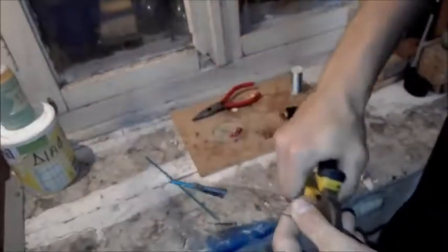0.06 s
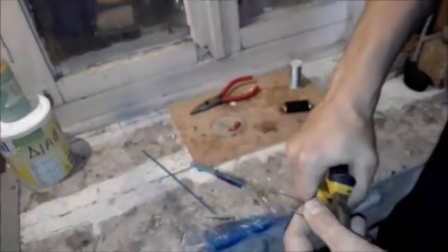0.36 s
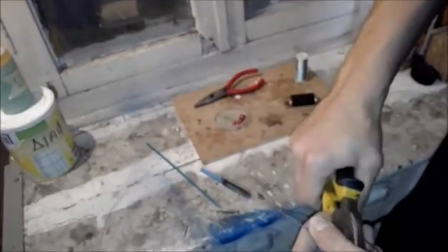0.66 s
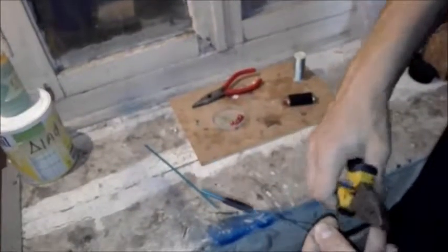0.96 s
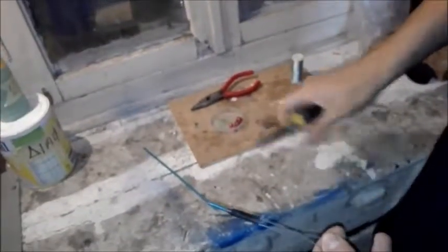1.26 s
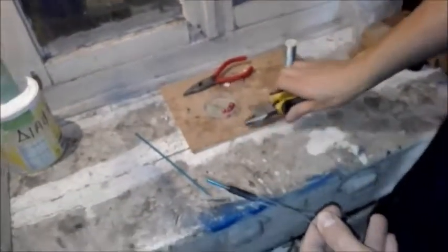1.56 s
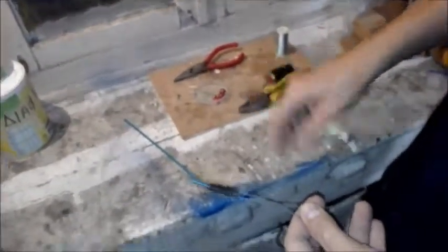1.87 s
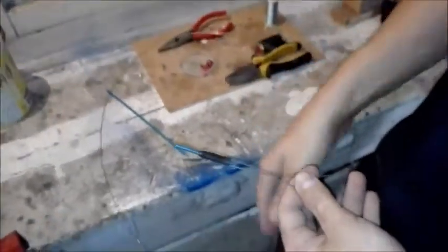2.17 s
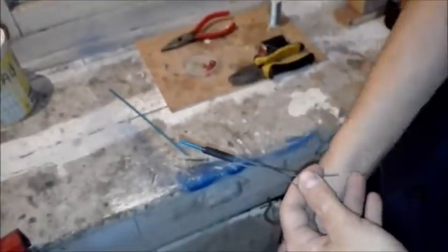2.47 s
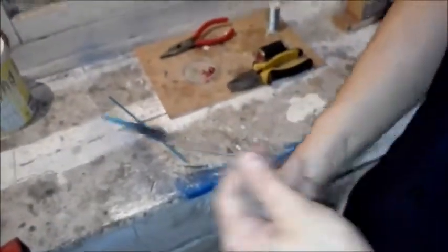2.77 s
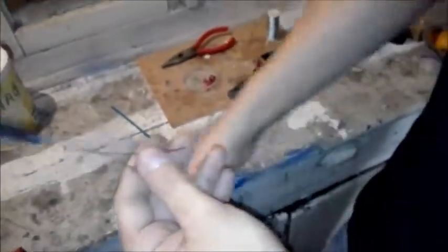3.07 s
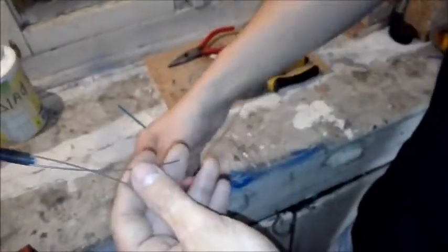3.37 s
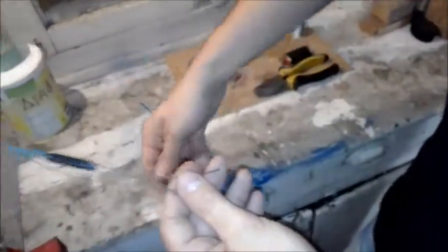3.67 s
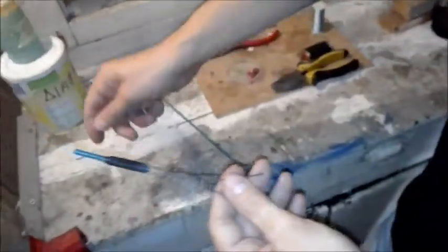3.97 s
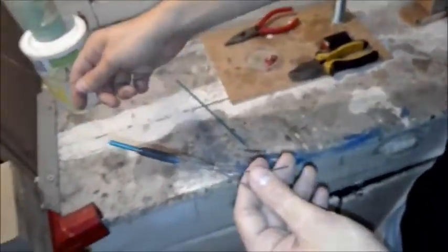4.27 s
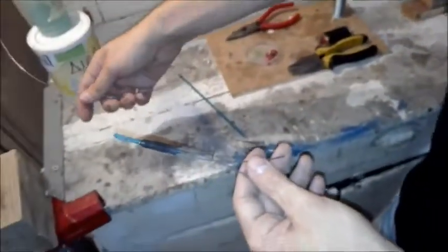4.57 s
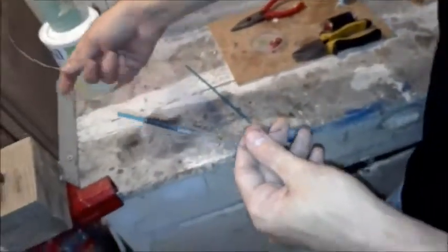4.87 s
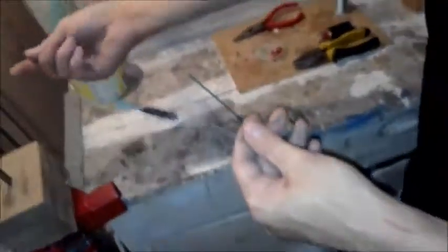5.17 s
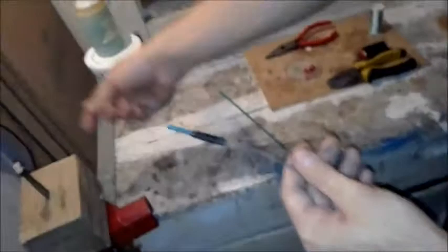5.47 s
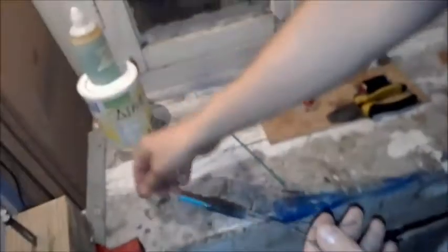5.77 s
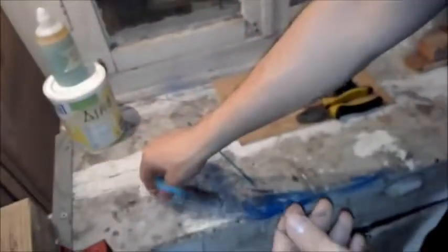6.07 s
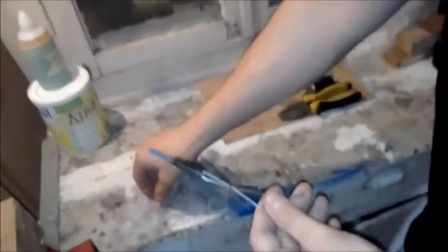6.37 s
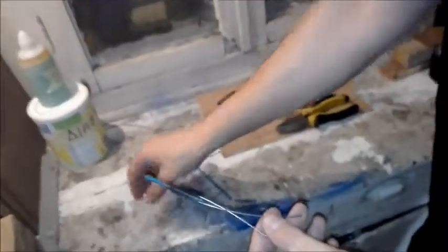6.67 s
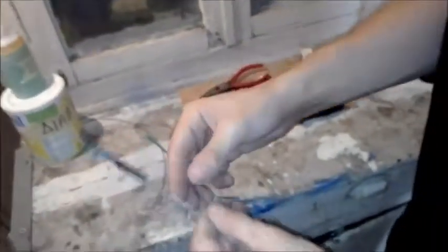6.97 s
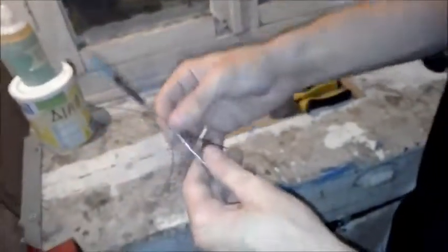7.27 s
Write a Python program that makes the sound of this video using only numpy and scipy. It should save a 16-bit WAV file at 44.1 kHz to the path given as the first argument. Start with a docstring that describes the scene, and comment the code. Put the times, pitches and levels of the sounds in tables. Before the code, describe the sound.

A sharp, ringing wire snip, a dull double thunk of pliers on wood, then light clicks and swishes of handled wire.

```python
"""Side cutters snap through steel wire close to the microphone: the fracture cracks and the tool rings.
The loose jaws clack, and the cutters land on a wooden bench, whose low modes boom in a double thunk.
The springy wire is handled: impacts make it tick, and stick-slip friction makes it scrape and swish.
A small workshop reverberates, over a low rumble, a faint hum and, near the end, a wavering drone."""
import sys
import numpy as np
from scipy import signal
from scipy.fft import rfft, irfft
from scipy.io import wavfile
from scipy.ndimage import map_coordinates

SR = 44100
rng = np.random.default_rng(int(sys.argv[2]) if len(sys.argv) > 2 else 0)


def transcribe(u):
    """Save the signal u as a 16-bit wav file named by the first command-line argument.

    u: samples, shape (n,) or (channels, n), limited to [-1, 1]; the rate is SR.
    q: integer samples, one column per channel.
    """
    v = np.clip(np.atleast_2d(u).T, -1, 1)
    q = np.round(v * 32767).astype(np.int16)
    wavfile.write(sys.argv[1], SR, q)


N = 326511


def undb(db):
    """Amplitude ratio of a level in dB."""
    return 10 ** (np.asarray(db) / 20)


def unit(x):
    """Normalisation to rms 1."""
    return x / np.sqrt(np.mean(x ** 2))


def curve(rows, axis=1):
    """Linear interpolation of one column over the times in the first."""
    rows = np.array(rows)
    return np.interp(np.arange(N) / SR, rows[:, 0], rows[:, axis])


def add(out, s, sound):
    """Superposition of a sound starting at s seconds."""
    i = int(s * SR)
    out[i:i + len(sound)] += sound[:N - i]


def fade(t60):
    """One second of exponential decay, falling 60 dB in t60 seconds."""
    return np.exp(-np.log(1000) * np.arange(SR) / SR / max(t60, 1e-3))


def colour(x, points):
    """Minimum-phase filtering through (Hz, dB) points."""
    size = 8192
    hz, db = np.transpose(points)
    log_hz = np.log(np.fft.rfftfreq(size, 1 / SR) + 1)
    log_gain = np.log(undb(np.interp(log_hz, np.log(hz), db)))
    causal_fold = np.r_[1, np.full(size // 2 - 1, 2), np.zeros(size // 2)]
    cepstrum = irfft(log_gain) * causal_fold
    return signal.oaconvolve(x, irfft(np.exp(rfft(cepstrum))))[:len(x)]


def noise(points):
    """Gaussian noise of rms 1, its spectrum shaped by (Hz, dB) points."""
    return unit(colour(rng.standard_normal(N), points))


def drift(rate_hz):
    """Slow random modulation: noise that falls steeply above rate_hz."""
    return noise([(rate_hz, 0), (4 * rate_hz, -40), (16 * rate_hz, -90)])


def wavering(hz, width_hz):
    """A tone of rms 1, its spectral line broadened by random amplitude and phase modulation."""
    wander = drift(width_hz)
    phase = 2 * np.pi * np.cumsum(hz * np.ones(N)) / SR
    return unit((1 + 1.3 * np.roll(wander, SR)) * np.sin(phase + 0.56 * wander))


def humps(rest_db, rows):
    """An envelope of Gaussian swells added to a steady gain."""
    t = np.arange(N) / SR
    return undb(rest_db) + sum(undb(db) * np.exp(-((t - s) / width) ** 2) for s, width, db in rows)


def ring(modes, scatter=0):
    """Free vibration of damped (Hz, dB, t60) modes, their phases spread over scatter cycles."""
    out = np.zeros(SR)
    for hz, db, t60 in modes:
        t = np.arange(min(int(2 * t60 * SR), SR)) / SR
        envelope = undb(db) * np.exp(-np.log(1000) * t / t60)
        out[:len(t)] += envelope * np.sin(2 * np.pi * (hz * t + scatter * rng.random()))
    return out


def burst(points, t60):
    """A dying rattle of micro-impacts, modelled as damped, filtered noise."""
    white = rng.standard_normal(SR)
    return colour(white * fade(t60), points) / np.std(colour(white, points))


def friction(per_s, spread_db):
    """Stick-slip force: a Poisson train of slips of uneven size."""
    slips = rng.random(N) < per_s / SR
    return unit(slips * rng.standard_normal(N) * undb(spread_db * np.minimum(rng.exponential(size=N), 4)))


def grip(depth_db, rate_hz):
    """Amplitude modulation by a contact that catches and lets go unevenly."""
    jolts = noise([(rate_hz, 0), (4 * rate_hz, -30), (16 * rate_hz, -80)])
    return unit(undb(depth_db * np.clip(jolts, -2, 2)))


def excite(force, modes):
    """Forced vibration of (Hz, dB, t60) modes; dB sets relative power whatever the damping."""
    body = ring([(hz, db - 10 * np.log10(t60), t60) for hz, db, t60 in modes], scatter=0.92)
    return unit(signal.fftconvolve(force, body)[:N])


def waver(x, depth, rate_hz):
    """Random frequency modulation: all pitches wander by the rms fraction depth."""
    place = np.cumsum(1 + depth * drift(rate_hz))
    return map_coordinates(x, [place], order=3, mode="wrap")


def glide(x, rows):
    """Resampling at a changing rate bends all pitches evenly through each stroke."""
    bends = sorted(point for s, length, _, _, start, end in rows
                   for point in ((s, start), (s + length, end)))
    return map_coordinates(x, [np.cumsum(2 ** curve(bends))], order=3, mode="wrap")


def strokes(rows, attack_s, release_s):
    """Envelope of strokes that add in power: each rises, slopes evenly in dB, then decays."""
    power, t = np.zeros(N), np.arange(SR) / SR
    for s, length, db, growth_db, *_ in rows:
        attack = np.clip(t / attack_s, 0, 1)
        hold = undb(db + growth_db * np.clip(t / length, 0, 1))
        release = np.exp(-np.log(1000) * np.maximum(t - length, 0) / release_s)
        add(power, s, (attack * hold * release) ** 2)
    return np.sqrt(power)


def workshop(dry, wet_db, t60s, gap_s):
    """Reverberation: near walls return a diffuse tail, with low, middle and high decay times t60s."""
    tail = np.zeros(SR)
    for edges_hz, t60 in zip(([150, 1200], [1200, 6500], [6500, 16000]), t60s):
        band = signal.butter(3, edges_hz, "band", fs=SR, output="sos")
        tail += signal.sosfilt(band, rng.standard_normal(SR)) * fade(t60)
    tail = np.r_[np.zeros(int(gap_s * SR)), tail / np.linalg.norm(tail)]
    return dry + undb(wet_db) * signal.fftconvolve(dry, tail)[:N]


def ambience():
    """Broadband ambient noise: steady air and hiss, with a low rumble and a dull murk that swell."""
    # Spectrum of the air. Each row: frequency in Hz, relative density in dB.
    air_spectrum = [(20, -8.5), (60, -7.5), (85, -23), (140, -15), (220, -30), (310, -24.5), (500, -42.5),
                    (800, -40), (1200, -36.5), (2600, -45), (14000, -52)]
    # Swells. Each row: centre in seconds, half width in seconds, level in dB.
    rumble_swells = [(0, 0.26, -46.5), (1.8, 0.59, -54), (2.85, 0.082, -47), (4.7, 0.55, -55),
                     (5.75, 0.11, -48), (6.0, 0.081, -49.5), (7.05, 0.18, -53.5)]
    murk_swells = [(3.95, 0.073, -58.5), (4.45, 0.51, -71.5), (5.7, 0.77, -69), (6.4, 0.17, -59.5),
                   (6.75, 0.35, -68.5)]
    air = undb(-63.5) * noise(air_spectrum)
    hiss = undb(-78.5) * unit(rng.standard_normal(N))
    rumble = noise([(10, -15), (28, 3), (50, 1.5), (75, -14.5), (150, -35.5), (500, -78.5)])
    murk = noise([(60, -8), (140, -1.5), (290, -1), (420, -12.5), (800, -28), (3000, -62.5)])
    return air + hiss + humps(-59.5, rumble_swells) * rumble + humps(-80, murk_swells) * murk


def hum():
    """Room hum: three narrow spectral lines that swell once together."""
    # Each row: frequency in Hz, relative level in dB.
    tones = [(113, -72.5), (167, -69.5), (307, -81)]
    # The row: centre in seconds, half width in seconds, added gain in dB.
    swell = [(2.9, 1, -1.4)]
    return humps(-4, swell) * sum(undb(db) * wavering(hz, width_hz=2.7) for hz, db in tones)


def ticks():
    """Impact excitation: wire ends flick off the bench, ringing other bending modes at each contact."""
    # Each row: start in seconds, level in dB, low body in dB, wire pitch in Hz, wire ring in dB.
    contacts = [(0.0738, -37.5, -17, 3860, -10), (0.7924, -58, -13, 7150, -4), (1.3145, -57, -12, 2600, 6),
                (1.369, -58, -19, 3500, 9), (1.892, -47, -5, 4390, 0), (2.5354, -61, -19, 2610, -2),
                (3.8322, -38.5, -15, 4990, -0.5), (3.857, -44, -1, 5240, -16),
                (3.901, -39.5, -17, 5550, -2), (3.9059, -31.5, -7, 5240, -6), (3.9235, -43, -7, 7700, 1),
                (3.9319, -38, -7, 6370, -10), (3.9492, -38, -5, 6900, -7), (4.022, -46, -0.5, 5140, -23),
                (4.257, -37, -4.5, 5420, -0.5), (4.315, -49.5, -4, 5240, -8), (4.4161, -51, -3, 6250, 4.5),
                (4.4264, -47.5, 5.5, 4960, -7), (5.31, -44.5, -17.5, 6920, -2),
                (5.3161, -32.5, -7.5, 5020, 1), (5.3355, -42, -7, 5070, -7), (5.3555, -46, -10, 6520, -6),
                (5.3664, -38, -17, 6850, -3), (5.4204, -53.5, -8, 1644, 4), (5.4558, -47, -3, 3140, -1),
                (5.493, -54.5, 4, 4900, -2.5), (5.5218, -63, 4, 4890, -4), (5.5622, -56, 5, 2720, -1),
                (5.8667, -45, -3.5, 3990, -3.5), (5.9286, -34.5, -10.5, 5400, -15),
                (5.9326, -34.5, -2.5, 4450, -8.5), (6.0546, -26, -11, 5500, -14.5)]
    # Hollow low ring under each tick, likely the loose wire's low modes.
    # Each row: frequency in Hz, relative level in dB, t60 in seconds.
    low_modes = [(742, -6.5, 0.11), (1054.3, 0, .14), (1250, -2.5, 0.1), (1458, -3.5, 0.11),
                 (1820, 0.5, 0.11)]
    main_mode = 11
    out, t = np.zeros(N), np.arange(SR) / SR
    onset = 1 - np.exp(-t / 0.0019)
    for s, db, body_db, hz, ring_db in contacts:
        # A shorter free end rings higher and clicks brighter, by 14 dB per octave.
        treble_db = -13 + 14 * np.log2(hz / 5000)
        spectrum = [(300, body_db - 15), (650, body_db - 7), (1100, body_db + 7), (2000, body_db + 4),
                    (3300, 0.081), (6500, -0.97), (9500, treble_db + 5.5), (14000, treble_db)]
        # Bending frequencies rise as the mode number squared; curvature splits each into a pair.
        neighbours = [(hz * (1 + step / main_mode) ** 2, -10, 0.03) for step in (-3, -2, -1, 1, 2)]
        modes = [(hz, 0, 0.037)] + neighbours
        pairs = [(f * rng.uniform(0.95, 1.03), level, t60) for f, level, t60 in 2 * modes]
        wire = ring(pairs, scatter=1)
        add(out, s, undb(db) * onset * (burst(spectrum, t60=0.029) + undb(ring_db) * wire))
        hollow_modes = [(f * rng.uniform(0.94, 1.06), level, t60) for f, level, t60 in low_modes]
        add(out, s, undb(db + body_db - 15) * onset * ring(hollow_modes, scatter=0.79))
    return out


def snip():
    """Fracture: the wire breaks, the jaws slam together and the cutters ring in free vibration."""
    # First crack, break, jaws meeting, then fainter snaps and echoes from the room.
    # Each row: start in seconds, relative level in dB.
    snaps = [(0.4709, -30.5), (0.4744, 3), (0.4772, 1), (0.4869, -8), (0.4911, -9), (0.5093, -16.5)]
    # Breaking steel. Each row: frequency in Hz, relative level in dB.
    crack_spectrum = [(100, -20.5), (180, -13.5), (250, -14), (380, -7), (700, -16), (1000, -8.5),
                      (1400, -12), (1700, 2), (1900, 6.5), (2150, 11.5), (2520, -6.5), (3400, 1.5),
                      (4000, -3), (4800, 3.5), (6500, -3), (7500, -0.5), (8700, -8.5), (14000, -12.5)]
    # Jaws and handles. Each row: frequency in Hz, relative level in dB, t60 in seconds.
    cutter_modes = [(1653, -7, .3), (1701, 3, .15), (1760, -5, .24), (1846, 1, .28), (1976, 1, .26),
                    (2024, 2, .22), (2095, 1, .26), (2174, 2, .2), (2223, 3, .18), (2283, -3, .28),
                    (2390, -8, .27), (3368, -6, .12), (3677, -9, .1), (4458, -6, .18), (4778, -8, .2),
                    (4970, -2, .17), (5508, -7, .2), (5760, -3, .19), (7250, 0, .07), (7980, -6, .1)]
    cracks, steel = np.zeros(N), np.zeros(N)
    for s, db in snaps:
        add(cracks, s, undb(db - 3.5) * burst(crack_spectrum, t60=0.023))
    break_s = snaps[1][0]
    add(steel, break_s, undb(-28) * ring(cutter_modes, scatter=0.64))
    return steel + workshop(cracks, wet_db=-14, t60s=(0.31, 0.29, 0.19), gap_s=0.008)


def clacks():
    """Damped impacts: the jaws fall open and rattle at the pivot, deadened by the hand."""
    # Each row: start in seconds, level in dB, relative treble in dB.
    impacts = [(0.847, -49.5, -6), (0.8552, -40.5, -28), (0.9234, -39.5, -7), (0.9583, -46, -5),
               (0.9652, -45.5, -7), (0.977, -50, -11)]
    # Spectrum below the treble. Each row: frequency in Hz, relative level in dB.
    body = [(500, -30), (1200, -6.5), (1600, 2), (2100, -3), (2800, 0.5), (3250, 8.5), (3650, 5)]
    out, t = np.zeros(N), np.arange(SR) / SR
    onset = 1 - np.exp(-t / 0.002)
    for s, db, treble_db in impacts:
        treble = [(4300, treble_db + 2.5), (7500, treble_db), (14000, -35)]
        add(out, s, undb(db) * onset * burst(body + treble, t60=0.047))
    return out


def drag():
    """Stick-slip on wood drives the loose wire's bending modes, which shift with the contact point."""
    # Each row: start and length in seconds, relative level and growth in dB.
    drags = [(1.312, 0.19, -49.5, -9), (1.48, 0.13, -61, 9.5), (1.88, 0.16, -57.5, -5),
             (2.03, 0.11, -58.5, -3), (2.16, 0.19, -68.5, -3.5), (6.3, 0.11, -47.5, 3),
             (6.41, 0.17, -48, -15.5)]
    # Each row: frequency in Hz, relative level in dB, t60 in seconds.
    wire_modes = [(969, 0, .07), (1460, 2.5, .05), (1920, -1, .07), (2560, 4, .06), (2840, -4, .07),
                  (3030, -2, .07), (3500, 0, .04), (4200, -4, .035), (4470, -4, .025), (6000, -7, .02)]
    force = friction(per_s=1400, spread_db=2.5) * grip(depth_db=1.5, rate_hz=40)
    scratch = unit(colour(force, [(600, -38), (1100, -5.5), (1600, 6.5), (2200, -6), (2700, 4.5),
                                  (3800, 2), (6500, -8.5), (10000, -30)]))
    singing = waver(excite(force, wire_modes), depth=0.008, rate_hz=9)
    return strokes(drags, attack_s=0.0048, release_s=0.13) * (undb(-7) * singing + undb(-9) * scratch)


def thunks():
    """Impacts excite the bench's plate modes as the cutters land nose first, drop flat and rock."""
    # The landing and a late light knock. Each row: start in seconds, relative thump and clatter in dB.
    impacts = [(1.6712, -13, -7.5), (1.7423, -2, 1), (1.7493, -9, 0.5), (1.812, -25, -11.5),
               (1.8187, -8, -14), (2.016, -25.5, -22), (5.8173, -47, -22.5)]
    # Each row: frequency in Hz, relative level in dB, t60 in seconds.
    bench_modes = [(88.1, 8.5, 0.32), (98.76, 10.5, 0.43), (115, -7, 0.57), (157.7, -16.5, 0.98),
                   (196.7, -2, 0.29), (259.7, -6, 0.24), (286, -8, 0.39), (375, -9.5, 0.25),
                   (527, -6.5, 0.3), (920, -11.5, 0.14)]
    # Steel on wood. Each row: frequency in Hz, relative level in dB.
    clatter = [(100, -8.5), (280, 1), (450, -10.5), (560, -8.5), (700, -14), (1020, -4), (1500, -7),
               (2400, -15.5), (4500, -18.5), (8000, -30.5), (14500, -43.5)]
    wood, steel = np.zeros(N), np.zeros(N)
    boom = ring(bench_modes) * (1 - np.exp(-np.arange(SR) / SR / 0.004))
    for s, thump_db, clatter_db in impacts:
        add(wood, s, undb(thump_db - 23.5) * boom)
        # Gentler contacts are duller.
        spectrum = [(hz, db + 0.099 * clatter_db * max(np.log2(hz / 1500), 0)) for hz, db in clatter]
        add(steel, s, undb(clatter_db - 22.5) * burst(spectrum, t60=0.14))
    return wood + workshop(steel, wet_db=-8, t60s=(0.3, 0.26, 0.29), gap_s=0.006)


def rub():
    """Dry friction drives wavering resonances of the bench and the wire."""
    # Each row: start and length in seconds, relative level and growth in dB.
    rubs = [(3.835, 0.019, -48, -10), (3.905, 0.1, -58, -15), (4.12, 0.067, -63, -4),
            (5.32, 0.094, -53.5, -2), (5.455, 0.12, -57, -7.5), (5.718, 0.061, -58, -0.5),
            (5.82, 0.215, -62.5, 6), (6.07, 0.13, -63, 2.5), (6.21, 0.24, -48, -3),
            (6.44, .14, -54.5, -12.5)]
    # Each row: frequency in Hz, relative level in dB.
    grit_spectrum = [(200, 4), (400, 6), (700, -10.5), (1100, 8), (1500, 9.5), (2000, 6.5), (2600, 8.5),
                     (4600, 1.5), (7000, -4.5), (9500, -24), (14000, -13)]
    force = friction(per_s=2500, spread_db=-3.5)
    grit = unit(colour(force, grit_spectrum))
    resonances = excite(force, [(1077, 6.2, 0.022), (1493, 2.5, 0.029), (1650, 2.7, 0.0098),
                                (2615, 1.6, 0.046), (3190, 2.0, 0.014), (4600, 1.1, 0.048)])
    resonances = waver(resonances, depth=0.035, rate_hz=5)
    return strokes(rubs, attack_s=0.0082, release_s=0.16) * (undb(-5) * grit + undb(-7) * resonances)


def slide():
    """Finger friction makes the held wire zing; its modes glide as the free length changes."""
    # Each row: start and length in seconds, relative level and growth in dB, two end bends in octaves.
    slides = [(4.258, 0.066, -54.5, -8, 0.063, 0.062), (4.413, 0.094, -49, -8.5, .02, -0.013),
              (4.51, 0.096, -56.5, 1, 0.0014, 0.0015), (4.63, 0.12, -68.5, -7.5, -0.01, -0.045),
              (5.04, 0.1, -65, 8.5, 0.085, 0.035), (5.196, 0.072, -61, 9.5, 0.082, 0.046),
              (5.317, 0.064, -49.5, -6, 0.035, 0.024)]
    # Each row: frequency in Hz, relative level in dB, t60 in seconds.
    wire_modes = [(958, -6, .08), (1810, -4, .07), (2870, -7, .07), (3540, -7, .08), (4240, -2, .07),
                  (4660, 3, .08), (5310, 3, .06), (5600, 0, .07), (6380, 0.5, .055), (7200, -9, .04),
                  (8010, -12, .03)]
    force = friction(per_s=2200, spread_db=2) * grip(depth_db=2.4, rate_hz=45)
    scratch = unit(colour(force, [(600, -8.5), (1100, 4), (1800, 2.5), (2400, -3), (3400, 0.5),
                                  (5500, 2), (8500, -7), (14000, -25)]))
    singing = waver(glide(excite(force, wire_modes), slides), depth=0.008, rate_hz=14)
    envelope = strokes(slides, attack_s=0.0083, release_s=0.066)
    return envelope * (undb(-2.5) * singing + undb(-9.5) * scratch)


def drone():
    """A faint tone, modulated in frequency and amplitude, that fades in and out exponentially."""
    # Each row: time in seconds, frequency in Hz, relative level in dB.
    contour = [(5.48, 222.6, -58.5), (5.8, 227.4, -61), (5.89, 161.7, -61.5), (6.02, 136, -56.5),
               (6.12, 196.4, -60.5), (6.28, 216.6, -61.5), (6.35, 240.3, -53.5), (6.52, 276.3, -52.5),
               (6.62, 275.8, -53.5)]
    t = np.arange(N) / SR
    outside_s = np.abs(t - np.clip(t, contour[0][0], contour[-1][0]))
    envelope = undb(curve(contour, axis=2) - 0.5) * np.exp(-outside_s / 0.067)
    return envelope * wavering(curve(contour), width_hz=20)


def swish():
    """Rapid stick-slip: the wire whisks over the bench edge, with bright grit and a resonant squeak."""
    # Each row: start and length in seconds, then relative level, growth and squeak in dB.
    swishes = [(6.207, 0.018, -40.5, 5.5, -12.5), (6.232, 0.029, -28.5, 1, -3),
               (6.313, 0.15, -40, -2.5, -21)]
    # Each row: frequency in Hz, relative level in dB, t60 in seconds.
    squeak_modes = [(3870, -7, 0.05), (4310, 0, 0.06), (5590, -2, 0.022), (6810, -3, 0.03),
                    (7320, -1, 0.03), (7520, 0, 0.04), (9500, -4, 0.026), (11600, -5, 0.015),
                    (13800, -10, .012)]
    attack_s, release_s = 0.0061, 0.088
    force = friction(per_s=8000, spread_db=1.5) * grip(depth_db=1.3, rate_hz=70)
    grit = unit(colour(force, [(800, -15), (3000, 5), (4500, 9.5), (7500, 3.5), (11000, -1), (14000, 0)]))
    squeaks = [(s, length, db + squeak_db, growth) for s, length, db, growth, squeak_db in swishes]
    squeak = strokes(squeaks, attack_s, release_s) * excite(force, squeak_modes)
    return squeak + undb(-7) * strokes(swishes, attack_s, release_s) * grit


def scene():
    """Superposition of the cut, the landing, the reverberant handling and the background, in mono."""
    handling = clacks() + ticks() + drag() + slide() + rub() + swish()
    handling = workshop(handling, wet_db=-7, t60s=(0.34, 0.19, 0.19), gap_s=0.0061)
    return (snip() + thunks() + handling + ambience() + hum() + drone())[None]


def record(dry):
    """Hard clipping: the microphone overloads on the snap; a low-pass removes the highest treble."""
    top_hz = 14250
    lowpass = signal.ellip(10, 0.2, 70, top_hz, fs=SR, output="sos")
    return signal.sosfilt(lowpass, np.clip(dry, -1, 1))


dry = scene()
out = record(dry)
transcribe(out)
```